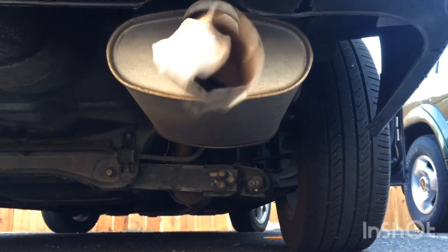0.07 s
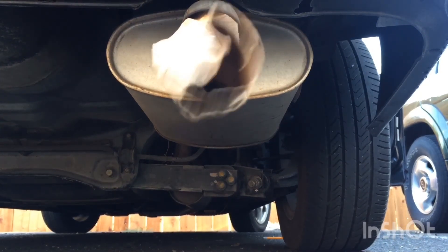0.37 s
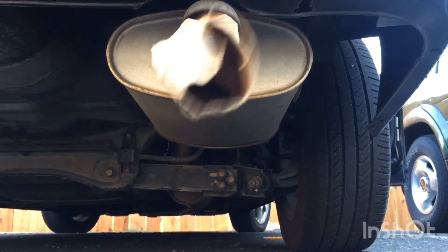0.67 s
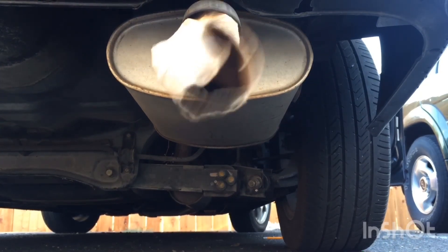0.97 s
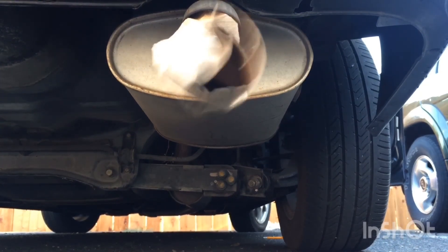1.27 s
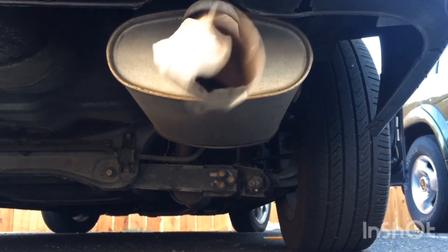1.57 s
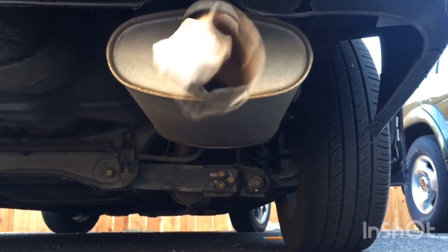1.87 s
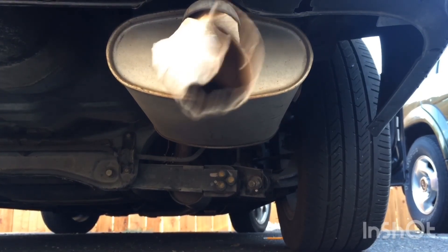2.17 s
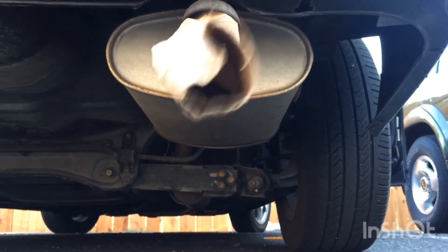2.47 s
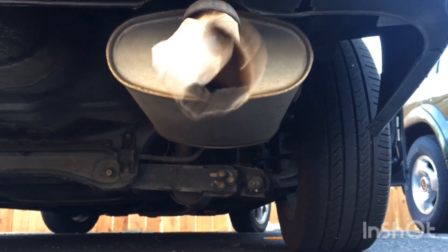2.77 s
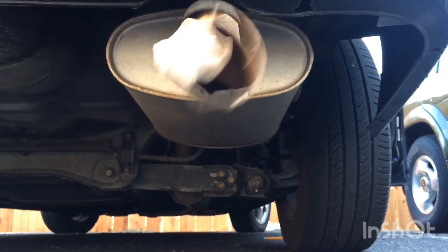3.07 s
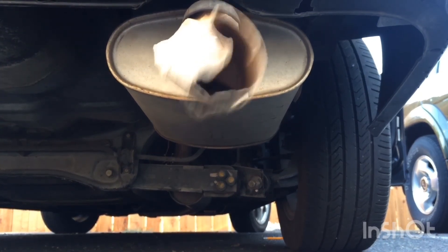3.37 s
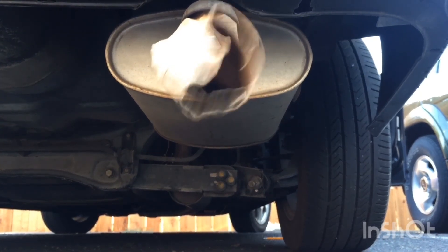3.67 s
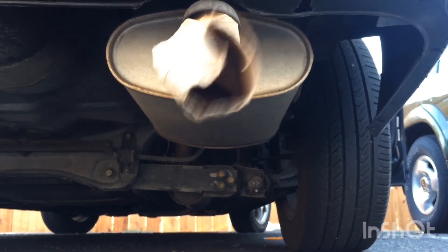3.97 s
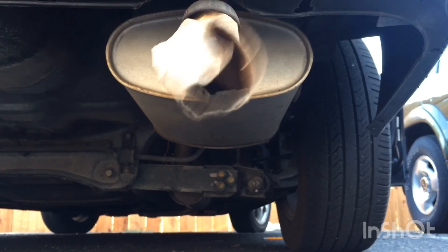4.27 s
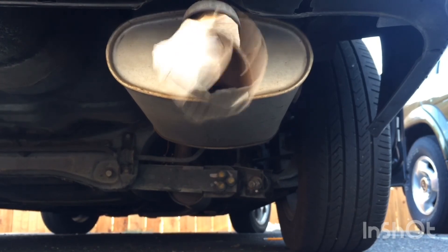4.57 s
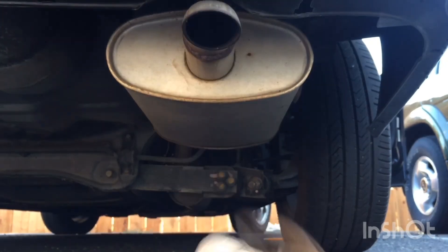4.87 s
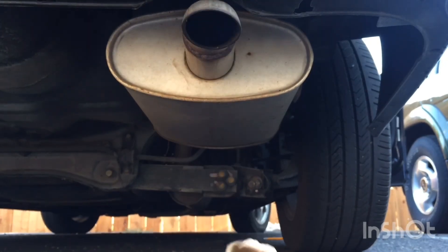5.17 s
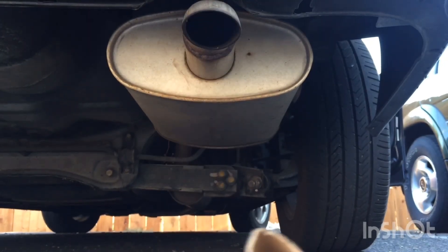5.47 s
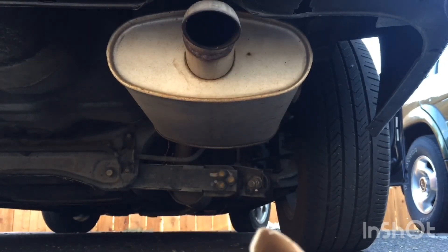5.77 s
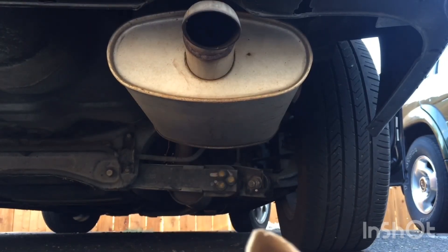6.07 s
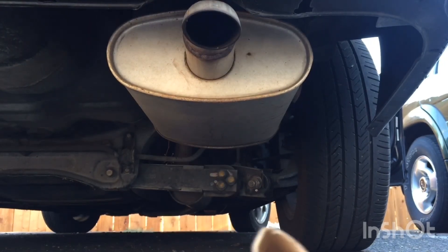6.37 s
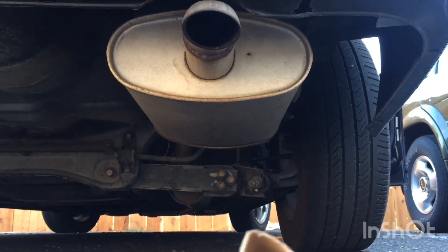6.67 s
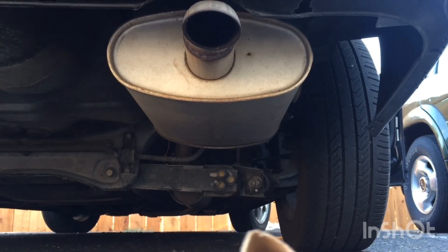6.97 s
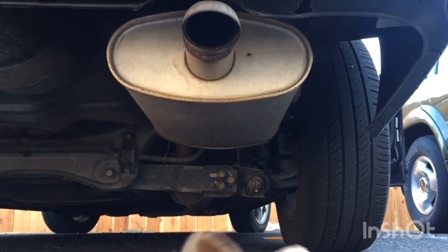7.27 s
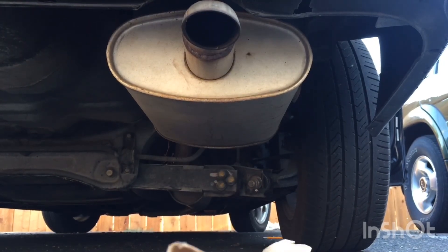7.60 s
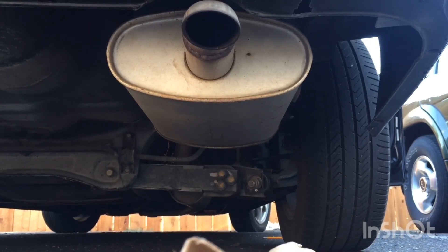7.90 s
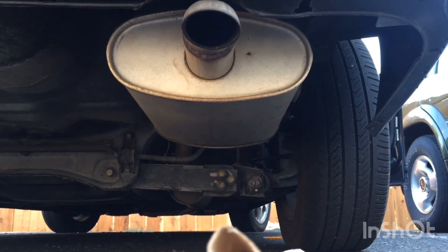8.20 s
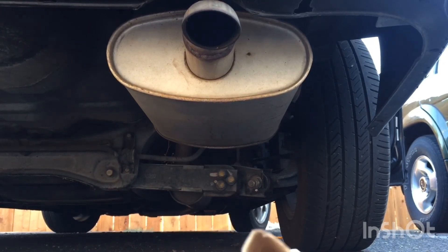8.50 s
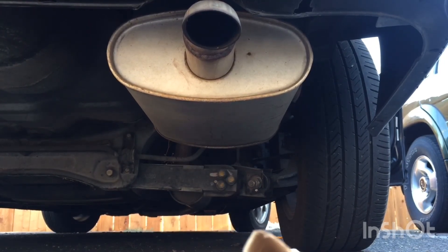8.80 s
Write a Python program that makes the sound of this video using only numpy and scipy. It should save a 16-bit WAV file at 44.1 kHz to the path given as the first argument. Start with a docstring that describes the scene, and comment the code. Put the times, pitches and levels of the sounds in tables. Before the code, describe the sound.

Heard from just behind a tailpipe, puffs of exhaust buffet the microphone over an idling four-cylinder car, and gas hisses in quick pulses past a flapping piece of cardboard. A harder push blasts the cardboard away, briefly overloading the microphone. Three short revs follow, each higher than the last, with a deep boom and more wind thumps, before the engine winds down.

```python
"""Gusts of exhaust thump on the microphone over the soft pulse and rush of an idling four-cylinder car.
The microphone stands in the gas stream, close behind a tailpipe with cardboard stuck on it.
Each firing lifts the cardboard and hisses past its edge, until a harder push blows it off.
The engine is then blipped three times: the open pipe booms, and more gusts buffet
the microphone. The strongest overload it."""
import sys
import numpy as np
from scipy import signal
from scipy.fft import rfft, irfft, next_fast_len
from scipy.io import wavfile
from scipy.ndimage import map_coordinates

SR = 44100
rng = np.random.default_rng(int(sys.argv[2]) if len(sys.argv) > 2 else 0)


def store_wav(level_fs):
    """Save 16-bit WAV to argv[1]."""
    pcm = np.round(np.clip(np.atleast_2d(level_fs), -1, 1) * 32767)
    wavfile.write(sys.argv[1], SR, pcm.T.astype(np.int16))


N = 398663
TIME = np.arange(N) / SR
IDLE_HZ = 23.965  # firings a second
THUMP_DB = 3  # a grazing gust's thump above its eddies

# gusts that hit the microphone squarely: (time [s], eddies [dB], thump [dB], eddy rate [Hz])
DIRECT_GUSTS = [(.121, -15.5, -14, 356), (.157, -13, -29, 554), (.195, -17, -13, 384),
                (.317, -17, -12, 480), (.357, -13.5, -9, 500), (.397, -17, -6.5, 305),
                (.438, -10, -11, 458), (.605, -14.5, -9, 444), (.643, -21, -11, 370),
                (.727, -14, -8.5, 370), (0.757, -11, -3, 452), (.818, -19, -15, 447),
                (0.85, -18, -9.5, 360), (.935, -17, -11, 450), (1.019, -16.5, -8.5, 380),
                (1.066, -16.5, -10.5, 577), (1.12, -17.5, -17, 427), (1.144, -11.5, -5.5, 380),
                (1.215, -11.5, -12.5, 519), (1.314, -10, -9.5, 650), (1.401, -17.5, -15, 555),
                (1.444, -14, -10.5, 416), (1.493, -16, -14, 554), (1.608, -12, -10.5, 340),
                (1.732, -18, -11, 397), (1.751, -17, -11, 500), (1.781, -16.5, -15, 460),
                (1.813, -15, -12.5, 460), (1.902, -23.5, -11.5, 620), (1.945, -19.5, -11, 452),
                (2.072, -16, -11.5, 415), (2.114, -12, -7, 320), (2.151, -12.5, -16, 644),
                (2.196, -13.5, -14, 510), (2.228, -12.5, -6, 590), (2.274, -15, -13, 583),
                (2.316, -14, -12, 627), (2.36, -17.5, -15, 353), (2.525, -16, -8.5, 298),
                (2.619, -15.5, -13, 466), (2.654, -12.5, -17, 517), (2.749, -17.5, -13.5, 458),
                (2.828, -22.5, -10.5, 310), (2.994, -16.5, -25, 470), (3.027, -12, -7.5, 516),
                (3.07, -19, -14, 505), (3.159, -13, -12.5, 504), (3.194, -18.5, -10, 490),
                (3.233, -12.5, -8.5, 515), (3.287, -14, -11.5, 368), (3.357, -20, -11, 470),
                (3.442, -13, -11, 626), (3.539, -16.5, -14.5, 426), (3.576, -16, -16, 500),
                (3.705, -14, -12, 378), (3.785, -12, -9, 564), (3.855, -12.5, -9, 513),
                (3.913, -19, -14, 394), (4.023, -18.5, -17, 577), (4.256, -18, -13, 433),
                (4.447, -11, -6.5, 554), (4.489, -13, -7, 408), (4.521, -6.5, -14, 476),
                (4.58, -16.5, -11.5, 540), (4.662, -14, -10, 634), (4.694, -9, 3, 505),
                (4.717, -5.5, -4, 727), (4.754, 1, -0.5, 703), (4.796, -6, -4, 642),
                (4.835, -12.5, -25.5, 827), (4.876, -27, -28, 726), (4.978, -22, -22, 350),
                (5.034, -30, -38, 706), (5.049, -21.5, -22.5, 486), (5.094, -25, -23.5, 553),
                (5.965, -34, -19, 380), (6.125, -14, -11, 416), (6.161, -8, 0.5, 451.3),
                (6.187, -15, -18, 426), (6.21, -13.5, -10.5, 520), (6.236, -15, -16, 630),
                (6.307, -18, -27, 407), (6.362, -25.5, -32, 520), (6.401, -28.5, -21.5, 460),
                (7.036, -6.5, -2, 688), (7.058, -10.5, -8, 710), (7.097, -12, -22, 580),
                (7.137, -12, -8, 670), (7.16, -19, -19, 760), (7.203, -17.5, -20, 498),
                (7.226, -18.5, -20.5, 462), (7.268, -22.5, -24, 479.4), (8.047, -25, -18, 372),
                (8.075, -23, -13, 344), (8.115, -22, -19, 390), (8.174, -24.5, -24, 398),
                (8.345, -32, -14, 300), (8.382, -18, -18, 450), (8.497, -26, -19, 330),
                (8.549, -22, -13.5, 290), (8.695, -17, -10, 320), (8.735, -18, -12.5, 350),
                (8.78, -22.5, -15, 399), (8.827, -12.5, -8, 380), (8.865, -16, -10.5, 321),
                (8.894, -20, -29, 351), (8.991, -12, -16, 361)]
# the engine once the pipe is open: (time [s], firing rate [Hz], boom level [dB])
ENGINE_REVS = [(4.88, 23.91, -49), (5.15, 58.87, -32), (5.3, 57, -32), (5.42, 54.75, -25.5),
               (6.1, 44.83, -17), (6.25, 61.7, -25), (6.4, 66.2, -22.5), (6.49, 64.84, -13.5),
               (6.85, 56.88, -17), (7.0, 52.4, -18), (7.25, 88.05, -29), (7.42, 84.5, -30),
               (7.5, 80.7, -19.5), (7.72, 74.5, -16.5), (7.79, 70.5, -10.5), (8.0, 59.54, -12.5),
               (8.12, 49.3, -19), (8.35, 36.68, -23.5), (8.47, 32, -39.5), (9.04, 24.03, -28)]
# exhaust rush heard throughout, ducking after the loudest gusts and swelling back: (time [s], level [dB])
EXHAUST_RUSH = [(4.6, -40.5), (4.9, -52), (6.05, -34.5), (6.3, -39.5), (6.65, -38), (7.3, -39), (7.72, -35),
                (8.3, -44), (8.6, -38.5), (9.04, -39)]


def buffeting(firings, typical_hz=500.6, typical_s=.0039, snap_db_per_octave=26):
    """Gusts on the microphone: slow ones are long and dull, fast ones are short and snap."""
    # turbulence passing at 200 eddies a second: (frequency [Hz], level [dB])
    turbulence = [(20, 12), (70, 16), (170, 9.5), (300, 6), (550, -9), (1100, -27), (2500, -103),
                  (6000, -90)]
    out = np.zeros(N)
    knots = noise([(1, 0), (60, 0), (150, -25), (500, -90)])
    field = noise(turbulence) * undb(2 * knots)  # turbulence comes in separate knots
    for s, db, thump_db, hz in list(DIRECT_GUSTS) + list(grazing_gusts(firings)):
        length_s = typical_s * (typical_hz / hz) ** .898
        add(out, s - .1, gust(field, db, thump_db, hz, length_s))
        snap_db = db - 12 + snap_db_per_octave * np.log2(hz / typical_hz) + 1.1 * rng.standard_normal()
        add(out, s - .0008, snap() * undb(snap_db))
    return out


def gust(field, eddy_db, thump_db, eddy_hz, length_s, wake=.25, wake_s=.012, field_hz=200, split_hz=170):
    """A parcel of gas sweeps eddies over the capsule, louder and brighter when fast; centred in 0.2 s."""
    t = np.arange(-(SR // 10), SR // 10) / SR
    speed = (1 - wake) * bump(t, 1.55 * length_s, 1.5 * length_s) + wake * bump(t, 2 * length_s, wake_s)
    place = rng.uniform(0, N / 2) + np.cumsum(speed ** .55) * eddy_hz / field_hz
    swept = map_coordinates(field, [place], order=1, mode="wrap")
    eddies = cut(swept * speed ** 2.14, split_hz, "high")
    # the slow push of the whole parcel follows and rings out
    push = rng.standard_normal(len(t)) * bump(t - .0034, rise_s=.003, fall_s=.0084)
    thump = cut(push, [54, split_hz], "band")
    parcel = undb(eddy_db) * unit(eddies) + undb(thump_db) * unit(thump)
    return parcel / np.sqrt(10)  # levels hold over 20 ms


def snap(decay_s=.00052, grit=.24):
    """A vortex core crosses the microphone: a steep pressure front with a ragged tail."""
    t = np.arange(SR // 100) / SR
    front = np.exp(-t / decay_s) * rng.choice([-1, 1])
    tail = grit * np.exp(-t / (2 * decay_s)) * rng.standard_normal(len(t))
    crack = cut(cut(front + tail, 350, "high"), 2600, "low")
    return crack / np.abs(cut(crack, [1500, 3400], "band")).max()


def grazing_gusts(firings, idle_db=-24.5, fade_db_per_hz=1.5, eddy_hz=415, stray_s=.0055, attack_s=.029):
    """Each firing sheds two small gusts, fainter as the firings merge, stronger in a throttle blip."""
    # surges of gusts at each stab of the throttle: (time [s], level [dB], release [s])
    blips = [(5.08, -32, 0.11), (6.16, -11, 0.057), (7.06, -13, 0.076)]
    s = np.repeat(firings, 2)
    late, size, pace = rng.standard_normal((len(s), 3)).T
    rate = np.interp(s, TIME, curves(ENGINE_REVS)[0])
    puff = undb(idle_db - fade_db_per_hz * (rate - IDLE_HZ))
    surge = np.zeros(len(s))
    for at, blip_db, release_s in blips:
        release = np.exp(-np.abs(s - at) / release_s)
        surge += undb(blip_db) * np.where(s < at, bump(s - at, attack_s, attack_s), release)
    db = 20 * np.log10(np.hypot(puff, surge / np.sqrt(2))) + 1.3 * size
    rows = np.column_stack([s + stray_s * late, db, db + THUMP_DB, eddy_hz * undb(1.37 * pace)])
    to_direct_s = np.abs(s[:, None] - np.array(DIRECT_GUSTS)[:, 0]).min(axis=1)
    return rows[to_direct_s > .5 / rate]  # only firings without a direct hit; columns as DIRECT_GUSTS


def boom_and_rush(waver_db=3, throb=.14, round_trip_s=.0037, reflection=.32):
    """Firings boom once the pipe is open, purer when fast; throughout, a throbbing rush echoes in it."""
    # spectrum of the exhaust rush: (frequency [Hz], level [dB])
    rush_colour = [(150, -37), (250, -13), (330, -8), (517, -1), (544, -2.5), (782, -4), (914, -7),
                   (1310, -3.5), (1590, -8), (6330, -25.5), (11500, -35.5), (15600, -37)]
    hz, boom_db = curves(ENGINE_REVS)
    phase = 2 * np.pi * np.cumsum(hz) / SR
    overtones = sum((k / 2) ** -2.8 * np.sin(k * phase + rng.uniform(0, 2 * np.pi)) for k in range(2, 9))
    # no two firings are alike, which shows most in the overtones
    uneven = noise([(1, 0), (25, 0), (60, -30), (150, -90)])
    overtones *= undb(14 - .7389 * (hz - IDLE_HZ) + waver_db * uneven)
    boom = np.sqrt(2) * undb(boom_db + .3 * uneven) * (np.sin(phase) + overtones)
    opened = np.clip((TIME - ENGINE_REVS[0][0]) * 20, 0, 1)
    gas = noise(rush_colour) * (1 + throb * np.sin(phase))
    echoing = sum(reflection ** k * np.roll(gas, k * int(round_trip_s * SR)) for k in range(3))
    return opened * boom + undb(curves(EXHAUST_RUSH)[0]) * unit(echoing)


def swirl(gusts, wake_db=-11, linger_s=.025, steady_db=-35, patchy_db=3):
    """Stray eddies rumble on the microphone in patches, stirred up by each gust and dying away."""
    # spectrum of the rumble: (frequency [Hz], level [dB])
    swirl_colour = [(20, -29), (45, 4), (75, 8), (170, -5), (320, -11.5), (650, -19), (1300, -25),
                    (3000, -58)]
    patches = noise([(1, 0), (20, 0), (60, -30), (200, -90)])
    rumble = unit(noise(swirl_colour) * undb(patchy_db * patches))
    pole = np.exp(-1 / (linger_s * SR))
    stirred = np.sqrt(signal.lfilter([1 - pole], [1, -pole], gusts ** 2))
    return np.hypot(undb(wake_db) * stirred, undb(steady_db)) * rumble


def idle_pulses(firings, level_db=-27, lag_s=.01252):
    """Each idle firing sends a soft pressure pulse out of the silencer."""
    # resonances of the pulse: (frequency [Hz], width [Hz], relative level [dB])
    modes = [(62, 26, -12.5), (113, 100, -15)]
    kicks = np.zeros(N)
    for s in firings:
        add(kicks, s + lag_s, np.hanning(SR // 250) * undb(2 * rng.standard_normal()))
    ring = sum(undb(db) * signal.lfilter(*signal.iirpeak(hz, hz / width, SR), kicks)
               for hz, width, db in modes)
    return undb(level_db) * unit(cut(ring, 41, "high"))


def spurts_and_taps(tap_s=.001):
    """Bright jets of gas as the cardboard lets go or the throttle opens; light taps as the card lands."""
    # jets of gas: (time [s], level [dB], half length [s])
    jets = [(1.312, -34, 0.014), (4.62, -34, 0.0057), (4.668, -21, 0.0071), (4.709, -13.5, 0.0042),
            (4.717, -2.5, 0.00076), (4.745, -23, 0.0082), (4.755, -25, 0.001), (4.772, -21, 0.0015),
            (4.797, -16, 0.0029), (4.835, -18.5, 0.00087), (6.14, -36, 0.043), (7.035, -35, 0.061)]
    # the cardboard landing: (time [s], level [dB])
    taps = [(4.931, -49), (4.953, -42.5), (5.023, -49), (5.094, -42)]
    # spectrum of both: (frequency [Hz], level [dB])
    burst_colour = [(500, -14), (1500, 14.5), (2700, 2), (4500, 2.5), (6500, -1.5), (8500, -8), (12000, -9),
                    (15500, -17)]
    envelope = np.zeros(N)
    t = np.arange(-(SR // 4), SR // 4) / SR
    for s, db, half_s in list(jets) + [(s, db, tap_s) for s, db in taps]:
        add(envelope, s + t[0], undb(db) * bump(t, half_s, half_s))
    return envelope * noise(burst_colour)


def cardboard_flutter(firings, lag_s=.0022, leak=.18, scatter_db=.5):
    """Each firing pushes the cardboard open and it snaps back; gas hisses through the gap."""
    # gas squeezing past the edge: (time [s], level [dB])
    edge_hiss = [(0, -41), (.3, -44.5), (1.6, -48), (2.6, -48), (3.2, -48), (3.8, -47.5), (4.15, -45),
                 (4.55, -47.5)]
    # its spectrum: (frequency [Hz], level [dB])
    edge_colour = [(1650, -29), (2800, -36), (3470, -10), (3680, -4), (4400, 2.5), (4940, -3), (6920, -7.5),
                   (7700, -14.5), (9550, -15), (10300, -18.5), (11800, -13), (15600, -25)]
    gap = np.zeros(N)
    t = np.arange(-(SR // 20), SR // 20) / SR
    for s, size in zip(firings, rng.standard_normal(len(firings))):
        add(gap, s + t[0] + lag_s, undb(scatter_db * size) * bump(t, rise_s=.006, fall_s=.0032))
    attached = TIME < firings[-1]
    gap = (gap + leak) * attached
    gap /= np.sqrt(np.mean(gap[attached] ** 2))
    return noise(edge_colour) * gap * undb(curves(edge_hiss)[0])


def lip_hiss():
    """Fast gas rings narrow bands of hiss at the pipe's mouth; they die away as the engine slows."""
    # bands at full rush and 80 firings a second: (frequency [Hz], width [Hz], level [dB])
    modes = [(2900, 890, -66), (6000, 460, -53.5), (9050, 1100, -62.5)]
    bands = np.zeros(N)
    for hz, width, db in modes:
        band = cut(rng.standard_normal(N), [hz - width / 2, hz + width / 2], "band", order=1)
        bands += undb(db) * unit(band)
    flow = curves(ENGINE_REVS)[0] / 80
    ducking = undb(curves(EXHAUST_RUSH)[0] - np.array(EXHAUST_RUSH)[:, 1].max())
    return bands * flow ** 2.2 * ducking


def engine_firings(idle):
    """Times of all firings: the steady idle, then one per cycle of the changing firing rate."""
    cycles = np.floor(np.cumsum(curves(ENGINE_REVS)[0]) / SR)
    revving = TIME[1:][np.diff(cycles) > 0]
    return np.concatenate([idle, revving[revving > ENGINE_REVS[0][0]]])


def undb(db):
    """Decibels to gain."""
    return 10 ** (np.asarray(db) / 20)


def unit(x):
    """Scale to rms 1."""
    return x / np.sqrt(np.mean(x ** 2) + 1e-18)


def curves(table):
    """Columns of a table as lines over time."""
    s, *columns = np.transpose(table)
    return [np.interp(TIME, s, c) for c in columns]


def noise(colour):
    """Noise of rms 1 with a spectrum of (frequency [Hz], level [dB]) points."""
    hz, db = np.transpose(colour)
    size = next_fast_len(N)
    bins = np.maximum(np.fft.rfftfreq(size, 1 / SR), 1)
    gain = undb(np.interp(np.log(bins), np.log(hz), db))
    return unit(irfft(rfft(rng.standard_normal(size)) * gain, size)[:N])


def cut(x, hz, kind, order=2):
    """Butterworth filter."""
    return signal.sosfilt(signal.butter(order, hz, kind, fs=SR, output="sos"), x)


def bump(t, rise_s, fall_s):
    """A bell around t = 0 with its own width on each side."""
    return np.exp(-.5 * (t / np.where(t < 0, rise_s, fall_s)) ** 2)


def add(out, s, x):
    """Mix x into out from time s on."""
    start = int(round(s * SR))
    a, b = max(start, 0), min(start + len(x), N)
    if b > a:
        out[a:b] += x[a - start:b - start]


def scene():
    """All that reaches one microphone just behind the tailpipe."""
    idle = np.arange(.025, 4.85, 1 / IDLE_HZ)  # firing times while the cardboard holds
    gusts = buffeting(engine_firings(idle))
    exhaust = idle_pulses(idle) + boom_and_rush() + lip_hiss()
    return (gusts + swirl(gusts) + exhaust + cardboard_flutter(idle) + spurts_and_taps())[None]


def record(dry):
    """The microphone drops the deepest bass and highest treble; the strongest gusts clip flat."""
    clipped = np.clip(cut(dry, 35, "high", order=4), -1, 1)
    return signal.sosfilt(signal.ellip(8, .2, 70, 15700, fs=SR, output="sos"), clipped)


dry = scene()
out = record(dry)
store_wav(out)
```